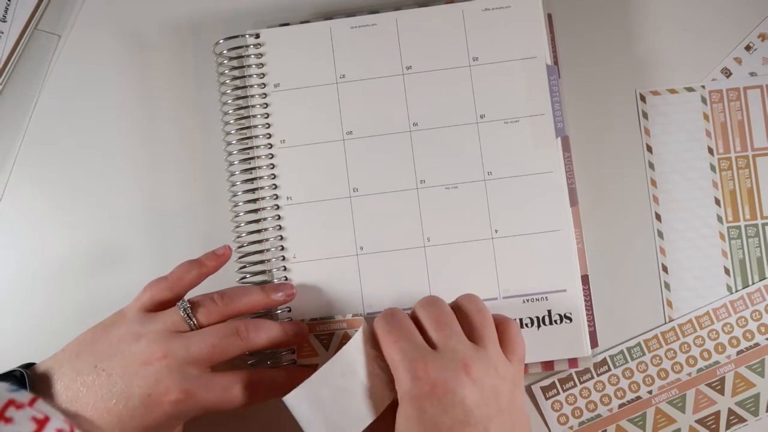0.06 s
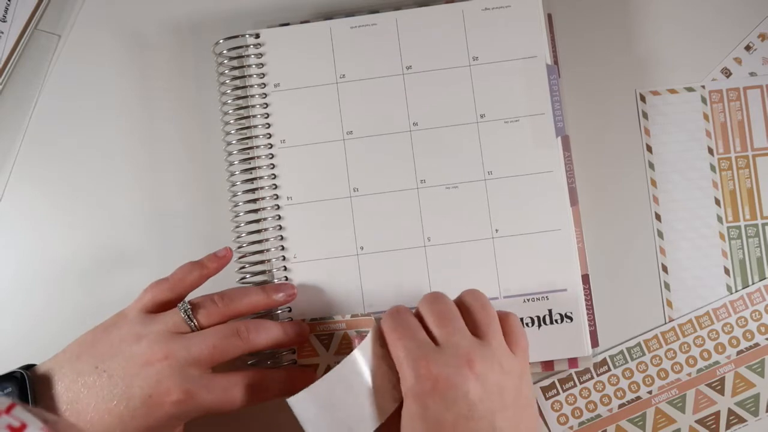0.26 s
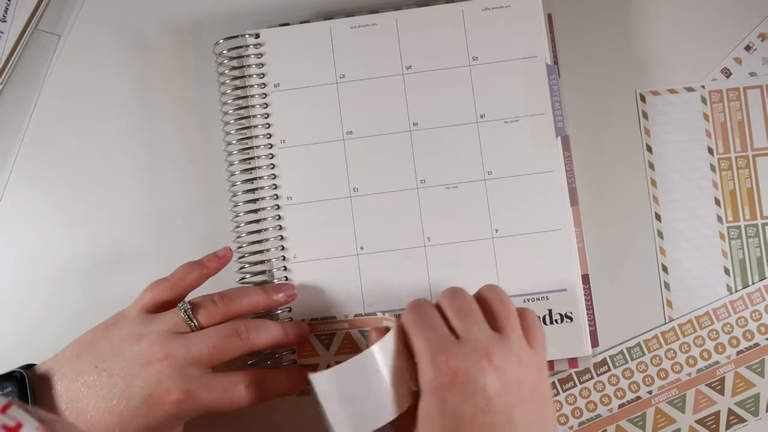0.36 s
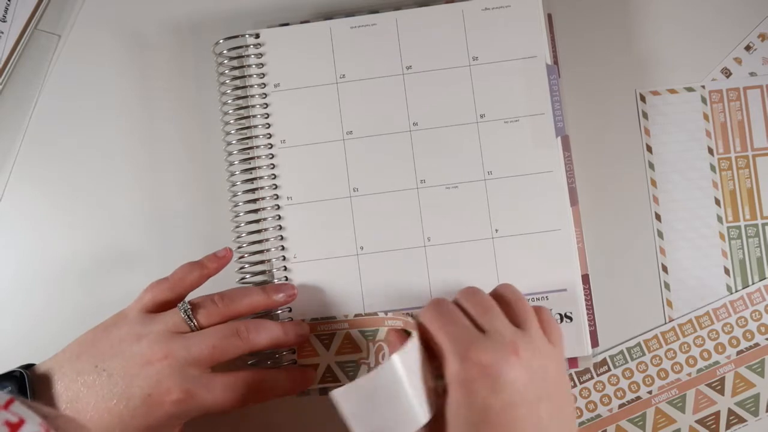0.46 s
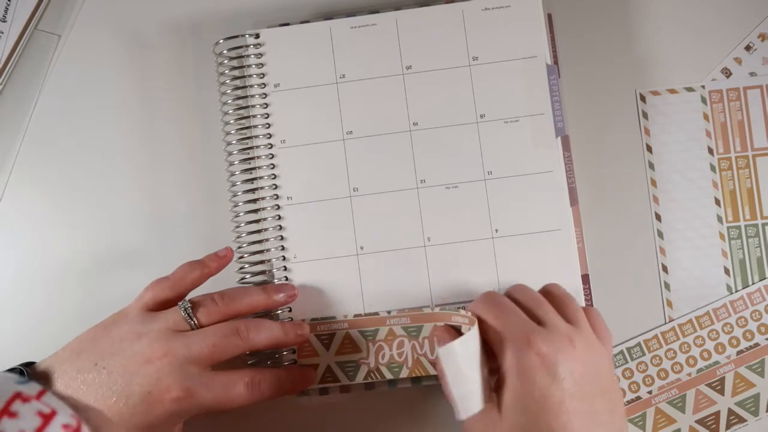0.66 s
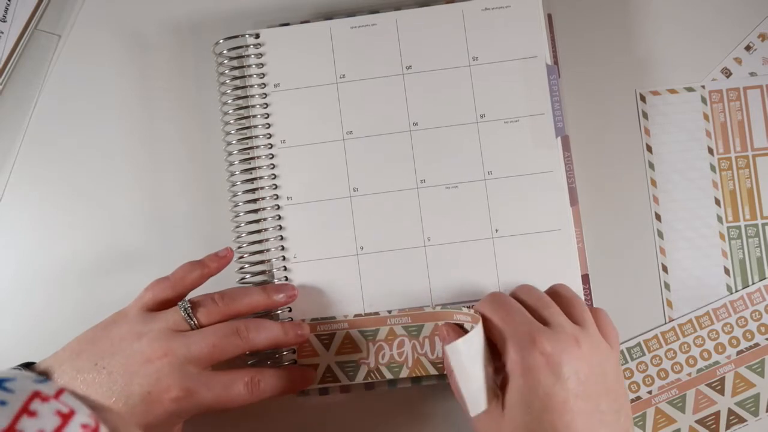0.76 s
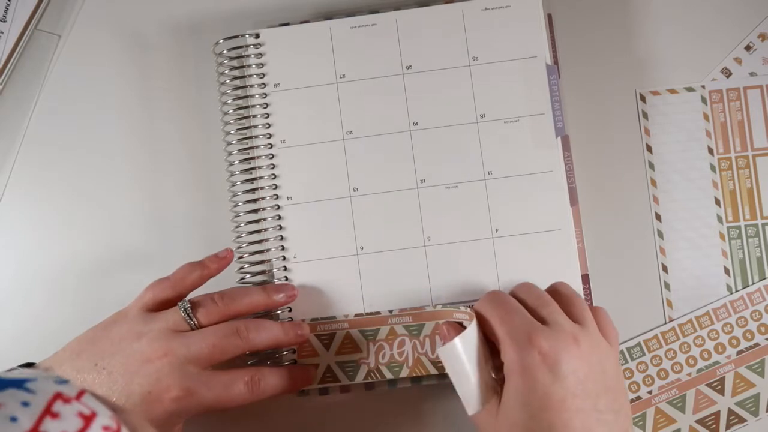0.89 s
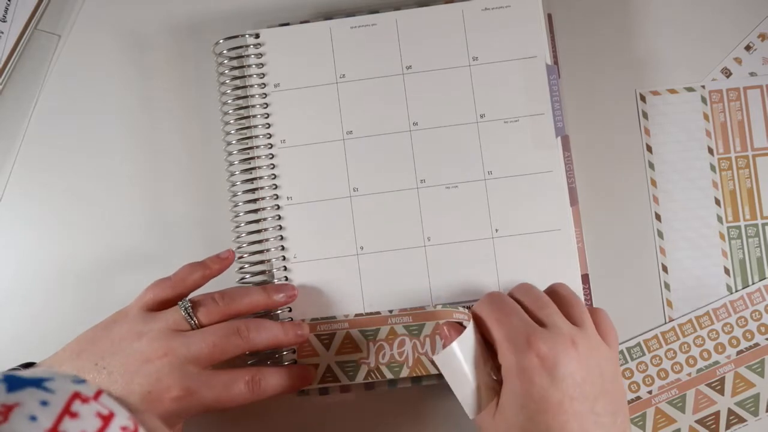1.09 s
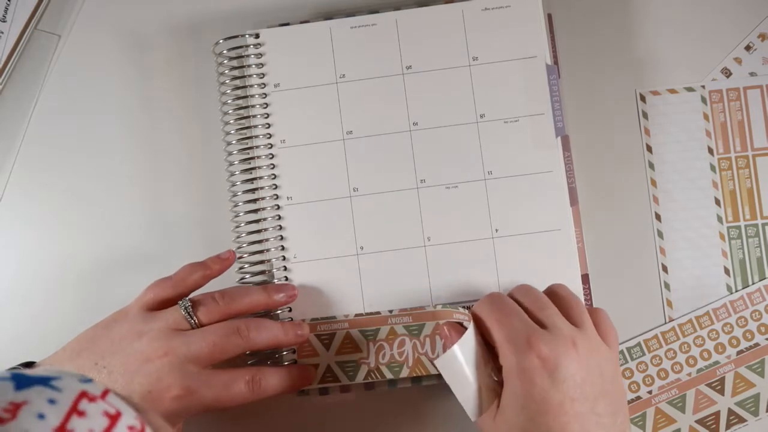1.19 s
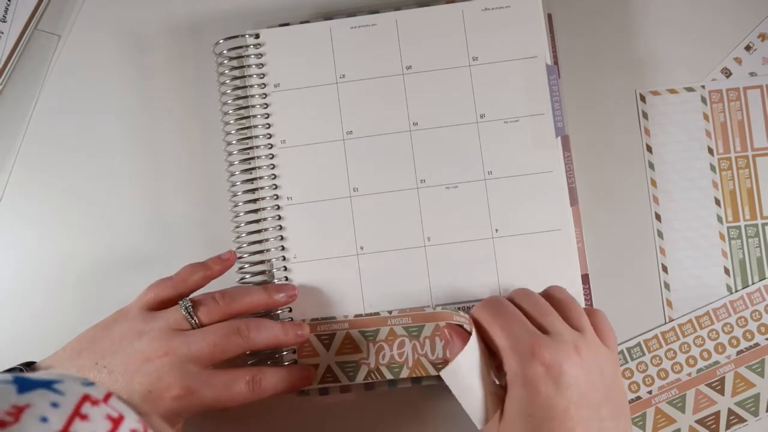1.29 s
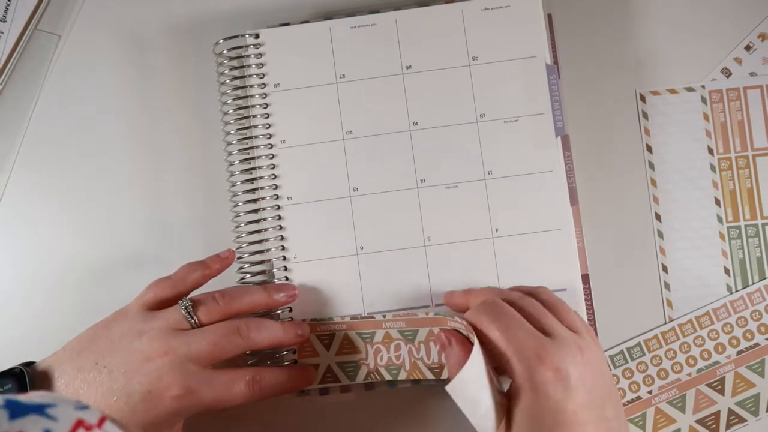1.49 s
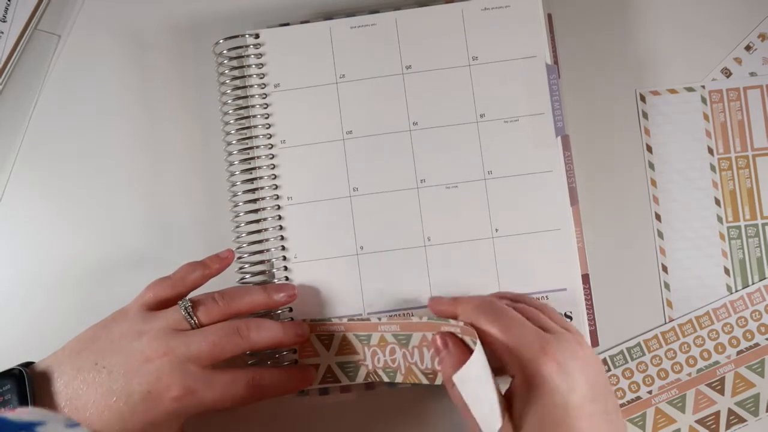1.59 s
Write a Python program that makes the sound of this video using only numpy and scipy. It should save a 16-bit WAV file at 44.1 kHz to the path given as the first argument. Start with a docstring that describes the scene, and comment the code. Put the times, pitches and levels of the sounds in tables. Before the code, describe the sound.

Paper backing peeled off a sticker, one sharp snap, faint crackles, in a small quiet room

```python
"""The paper liner is peeled from under a long sticker on a planner, at a desk in a small quiet room.
The stiff liner buckles with one sharp snap, a crack and decaying modes that the room echoes and scatters,
and a few dull pops, narrow-band impulses. The glue lets go in faint crackling pulls of dense tiny clicks.
Fingers press and smooth the sticker down in swells of coloured noise; low hum and room noise lie underneath."""
import sys
import numpy as np
from scipy import signal
from scipy.io import wavfile

SR = 44100
rng = np.random.default_rng(int(sys.argv[2]) if len(sys.argv) > 2 else 0)


def output_pcm(signal):
    """Save a mono or channel-first signal as 16-bit PCM at the path in sys.argv[1].

    Samples are clipped to [-1, 1] before scaling.
    """
    pcm = np.clip(np.atleast_2d(signal).T, -1, 1) * 32767
    wavfile.write(sys.argv[1], SR, np.round(pcm).astype(np.int16))


N = 72765
T = np.arange(N) / SR  # time in seconds
SNAP_S = 0.24828


def from_db(db):
    """Decibels are a logarithmic measure: 20 dB is a tenfold amplitude."""
    return 10 ** (np.asarray(db) / 20)


def rms_one(x):
    """Normalise the effective (root-mean-square) amplitude to 1."""
    return x / np.sqrt(np.mean(x ** 2) + 1e-20)


def at_hz(points, hz):
    """Interpolate a table on a logarithmic frequency axis, as pitch is heard."""
    table_hz, values = np.transpose(points)
    return np.interp(np.log(hz), np.log(table_hz), values)


def level(rows):
    """Amplitude envelope, linear in decibels between rows of time_s, level_db."""
    return from_db(np.interp(T, *np.transpose(rows)))


def band(x, low_hz, high_hz):
    """Band-pass filtering by a Butterworth response, flat between its edges."""
    sos = signal.butter(2, [low_hz, high_hz], "band", fs=SR, output="sos")
    return signal.sosfilt(sos, x + 1e-18)


def click(start_s):
    """Unit impulse, which holds all frequencies equally."""
    return 1. * (np.arange(N) == int(start_s * SR))


def blip(start_s, low_hz, high_hz):
    """Impulse response of a band-pass filter, scaled to peak height 1."""
    x = band(click(start_s), low_hz, high_hz)
    return x / np.abs(x).max()


def swells(rows):
    """Sum of Gaussian envelopes, each with its own rise and fall as standard deviations."""
    total = 0
    for peak_s, rise_s, fall_s, level_db in rows:
        spread_s = np.where(T < peak_s, rise_s, fall_s)
        total = total + from_db(level_db) * np.exp(-.5 * ((T - peak_s) / spread_s) ** 2)
    return total


def coloured(spectrum, source=None, shape=lambda hz: 1):
    """Third-octave synthesis: stereo noise bands sum to rms 1 before each takes its shape in time."""
    # target left-right correlation; columns: frequency_hz, correlation
    likeness = [(40, .98), (90, 0.96), (170, 0.35), (350, 0.0089), (700, -0.043), (1400, 0.22),
                (2800, 0.62), (5500, 0.26), (9000, -0.13), (14000, -0.25)]
    edges_hz = 22 * 2 ** (np.arange(30) / 3)
    if source is None:
        source = rng.standard_normal((2, 2, N))
    out, power = 0, 0
    for k, (low_hz, high_hz) in enumerate(zip(edges_hz, edges_hz[1:])):
        centre_hz = np.sqrt(low_hz * high_hz)
        # neighbouring bands take turns between two independent sources
        mid, side = band(source[k % 2], low_hz, high_hz) * from_db(at_hz(spectrum, centre_hz))
        alike = np.clip(at_hz(likeness, centre_hz), -1, 1)
        stereo = np.sqrt(1 + alike) * mid + np.sqrt(1 - alike) * side * [[1], [-1]]
        out = out + stereo * shape(centre_hz)
        power = power + np.mean(stereo ** 2)
    return out / np.sqrt(power)


def grainy(smooth_db):
    """Shot noise: a dense random run of uneven tiny clicks (rms 1) over even noise at smooth_db."""
    grains_per_s, spread_db = 3500, 2.5
    sizes = from_db(spread_db * np.minimum(rng.exponential(1, N), 5))
    present = rng.random(N) < grains_per_s / SR
    grains = present * sizes * rng.standard_normal((2, 2, N))
    return rms_one(grains) + from_db(smooth_db) * rng.standard_normal((2, 2, N))


def resonance(hz, width_hz):
    """Resonance kept ringing by friction: noise selected by a narrow band, rms 1."""
    return rms_one(band(rng.standard_normal(N), hz - width_hz / 2, hz + width_hz / 2))


def room_tone():
    """Stationary noise and pure tones: steady air noise, hum and a thin whine, with a varying deep rumble."""
    # air noise; columns: frequency_hz, relative_density_db (per Hz)
    floor_colour = [(25, -8), (60, -9), (130, -1), (200, -3.5), (330, -3.5), (600, -11.5), (1200, -15),
                    (2400, -21), (4500, -26), (8000, -30.5), (13000, -37), (14200, -42), (15500, -49)]
    # level of the deep bass; columns: time_s, level_db
    rumble_level = [(0, -69), (.2, -58), (.27, -57.5), (.65, -58.5), (.85, -61), (1.15, -69), (1.3, -65),
                    (1.65, -54)]
    # deep bass; columns: frequency_hz, relative_density_db (per Hz)
    rumble_colour = [(25, 2), (42, -13), (58, 10), (80, -10), (150, -23), (500, -70)]
    # hum and a thin electrical whine; columns: frequency_hz, rms_level_db
    tones = [(60, -65.5), (90, -63.5), (119.8, -63.5), (13010, -83)]
    floor_db = -52.5
    hum = 0
    for hz, rms_db in tones:
        sine = np.sin(2 * np.pi * (hz * T + rng.random()))
        hum = hum + from_db(rms_db) * np.sqrt(2) * sine
    air = from_db(floor_db) * coloured(floor_colour)
    rumble = level(rumble_level) * coloured(rumble_colour)
    return air + rumble + hum


def fingers():
    """Friction and impact: skin slides over paper and liner, the page rings, each press thuds in the planner."""
    # fingers smooth the sticker; columns: peak_s, rise_s, fall_s, level_db
    rubs = [(1.185, .012, .012, -55.5), (1.365, .035, 0.014, -55.5), (1.41, 0.021, 0.026, -46),
            (1.47, .02, .04, -58), (1.545, 0.0069, 0.052, -54.5), (1.645, 0.025, .04, -56.5)]
    # the smooth liner slides between the fingers; columns: peak_s, rise_s, fall_s, level_db
    slides = [(.015, .03, 0.079, -65.5)]
    # the hand presses on the planner; columns: peak_s, rise_s, fall_s, level_db
    presses = [(.256, 0.0066, 0.039, -56), (.61, 0.027, 0.04, -55.5), (1.14, 0.013, 0.04, -55),
               (1.543, 0.0035, .02, -44), (1.642, 0.036, .02, -51)]
    # spectra of the three; columns: frequency_hz, relative_density_db (per Hz)
    rub_colour = [(300, -1), (600, -6), (950, 1.5), (1450, -6.5), (2150, 2.5), (3000, -3), (4000, -14),
                  (6500, -15), (9000, -19.5), (12500, -17), (15000, -34)]
    slide_colour = [(2000, -30), (5000, -8), (8000, -2), (12000, 6), (15000, -10)]
    press_colour = [(60, -31), (130, -4.5), (230, -1), (350, 2), (550, -5), (800, -13), (1500, -14.5),
                    (4000, -50)]
    # page under the last strokes; columns: frequency_hz, width_hz, level_db, peak_s, half_length_s
    page_rings = [(912, 72, -53, 1.643, 0.016), (2060, 130, -59, 1.615, 0.066)]
    smooth_db = 1.5  # even hiss against the grain of the skin
    rings = 0
    for hz, width_hz, level_db, peak_s, half_s in page_rings:
        rings = rings + resonance(hz, width_hz) * swells([(peak_s, half_s, half_s, level_db)])
    rubbing = swells(rubs) * coloured(rub_colour, grainy(smooth_db))
    sliding = swells(slides) * coloured(slide_colour, grainy(smooth_db))
    thuds = swells(presses) * coloured(press_colour)
    return rubbing + sliding + rings + thuds


def small_clicks(rows, width):
    """Narrow-band impulses, each around its own pitch; width is the ratio of band edge to pitch."""
    return sum(from_db(level_db) * blip(start_s, hz / width, hz * width) for start_s, level_db, hz in rows)


def ticks():
    """Impulsive release: single glue and paper ticks."""
    # columns: start_s, level_db, pitch_hz
    tick_rows = [(.0178, -41, 8540), (.0582, -50, 3500), (.6052, -30.5, 3300), (.6092, -38.5, 3270),
                 (.622, -38, 3100), (1.177, -47.5, 3830), (1.189, -53, 3300)]
    return small_clicks(tick_rows, 1.39)


def pops():
    """Band-limited radiation: dull pops of the flexing liner, which sounds only in one range."""
    # level before the range filter; columns: start_s, level_db, pitch_hz
    pop_rows = [(.3156, -35.5, 1000), (.3518, -33, 1020), (.3803, -41, 1040)]
    # range of the flexing sheet; columns: low_hz, high_hz
    pop_range = (560, 1620)
    return band(small_clicks(pop_rows, 1.35), *pop_range)


def peeling():
    """Fracture and stick-slip: glue threads break in tiny clicks, and the hardest pull squeaks faintly."""
    # strength of the peeling; columns: time_s, relative_level_db
    pull = [(0, -56), (.1, -58), (.2, -67.5), (.245, -53.5), (.36, -56), (.47, -61), (.52, -64),
            (.572, -59), (.588, -48.5), (.635, -51), (.665, -53), (.70, -63), (.83, -68), (.95, -81),
            (1.13, -89), (1.185, -64.5), (1.225, -69), (1.65, -63)]
    # columns: frequency_hz, relative_density_db (per Hz)
    peel_colour = [(400, -7), (900, 1), (1500, -7.5), (2300, -2.5), (3000, -5.5), (3800, -2.5), (5200, -9),
                   (7500, -14.5), (11000, -17.5), (15000, -36)]
    # glue sticks and slips; columns: peak_s, rise_s, fall_s, level_db
    squeaks = [(.591, 0.0037, .005, -51), (.632, 0.012, .005, -55.5)]
    squeak_hz, squeak_width_hz = 3640, 220
    room_blur_db = -1  # even noise against the grains
    crackle = level(pull) * coloured(peel_colour, grainy(room_blur_db))
    return crackle + swells(squeaks) * resonance(squeak_hz, squeak_width_hz)


def snap_in_room():
    """Reverberation: near scatter from the desk, a cluster from walls and ceiling, a tail shorter in treble."""
    # scattered snap; columns: frequency_hz, relative_density_db (per Hz)
    scatter_colour = [(150, -13), (500, -20), (1000, -17.5), (1600, -7.5), (2250, -2), (3300, -1.5),
                      (4300, 0.5), (5400, -6.5), (7200, -13.5), (10000, -9.5), (12500, -15.5), (15500, -23)]
    # time for the tail to fall by 60 dB; columns: frequency_hz, t60_s
    tail_t60 = [(300, 0.48), (2000, 0.32), (4000, .31), (8000, 0.24), (15000, 0.12)]
    near_db, near_t60_s = -27, 0.069
    wall_delay_s, wall_width_s, wall_db = .0228, 0.0039, -30.5
    tail_db, tail_rise_s = -30.5, 0.014
    age = np.maximum(T - SNAP_S, 0)
    near = (T > SNAP_S) * from_db(near_db - 60 * age / near_t60_s)
    walls = swells([(SNAP_S + wall_delay_s, wall_width_s, wall_width_s, wall_db)])
    build = 1 - np.exp(-age / tail_rise_s)

    def decay(hz):
        """Incoherent parts add in power."""
        tail = build * from_db(tail_db - 60 * age / at_hz(tail_t60, hz))
        return np.sqrt(near ** 2 + walls ** 2 + tail ** 2)

    return coloured(scatter_colour, shape=decay)


def snap():
    """Buckling excites the sheet's modes: one crack, a short ring, and their first echoes."""
    # crack of the buckling liner; columns: low_hz, high_hz, relative_level_db
    crack_bands = [(2270, 4160, -16), (7650, 9940, -25.5)]
    # ringing liner; columns: frequency_hz, relative_level_db, t60_s
    liner_modes = [(850, -55, 0.043), (1294, -37.5, 0.038), (1800, -47, 0.045), (2150, -27.5, 0.023),
                   (2800, -54, 0.041), (3164, -22.5, 0.02), (4014, -35, 0.021), (4370, -37, 0.017),
                   (6150, -49.5, 0.032), (7630, -43, 0.0094)]
    # early echoes from the desk and nearby things, then later ones from the ceiling;
    # columns: delay_s, relative_level_db, low_pass_hz
    echoes = [(.0005, -2.5, 15980), (.00117, -9, 14000), (.00615, -16, 9000), (.0208, -16, 15000),
              (.025, -10.5, 11000)]
    snap_db = 6.5  # gain on crack and ring together
    age = np.maximum(T - SNAP_S, 0)
    crack = sum(from_db(db) * blip(SNAP_S, low_hz, high_hz) for low_hz, high_hz, db in crack_bands)
    ring = 0
    for hz, db, t60_s in liner_modes:
        ring = ring + from_db(db - 60 * age / t60_s) * np.sin(2 * np.pi * hz * age)
    # the small sheet radiates mainly between these frequencies
    direct = -from_db(snap_db) * band(crack + ring, 700, 12700)
    out = direct
    for delay_s, db, top_hz in echoes:
        dull = signal.lfilter(*signal.butter(1, top_hz, fs=SR), direct)
        out = out + from_db(db) * np.interp(T - delay_s, T, dull)
    return out


def scene():
    """Superposition: paper and hands in front of the microphone, over the room tone."""
    left_db = -0.04  # the hands are a little to the right
    paper = fingers() + ticks() + pops() + peeling() + snap_in_room() + snap()
    return room_tone() + paper * from_db([[left_db], [0]])


def record(dry):
    """Band limiting: an elliptic low-pass cuts the top steeply."""
    cutoff_hz, ripple_db, stop_db = 15500, .1, 70
    sos = signal.ellip(10, ripple_db, stop_db, cutoff_hz, fs=SR, output="sos")
    return signal.sosfilt(sos, dry)


dry = scene()
out = record(dry)
output_pcm(out)
```